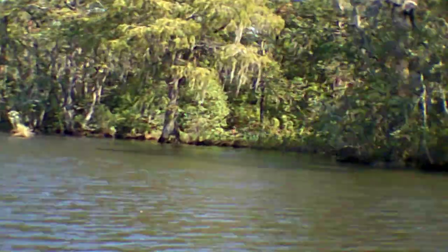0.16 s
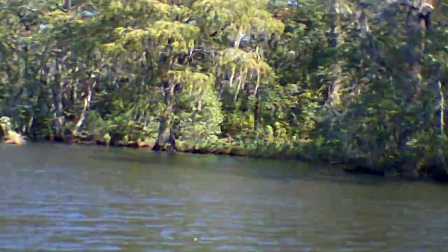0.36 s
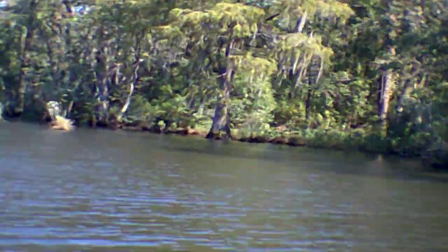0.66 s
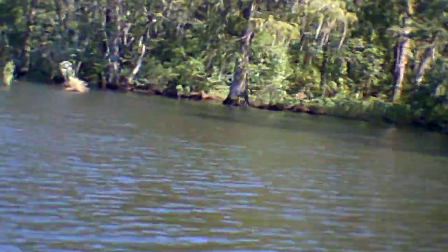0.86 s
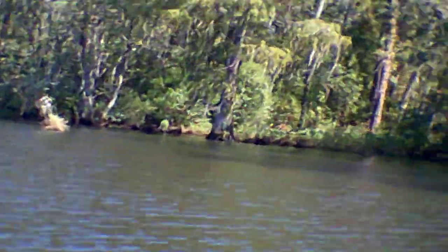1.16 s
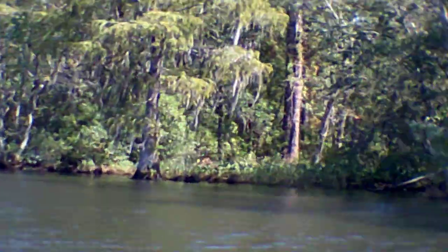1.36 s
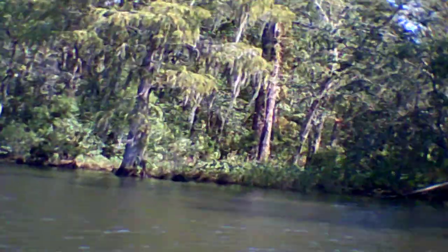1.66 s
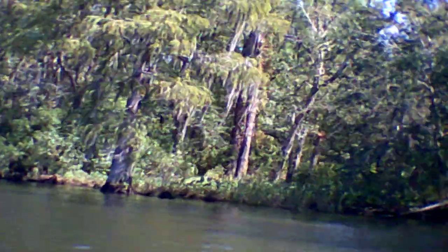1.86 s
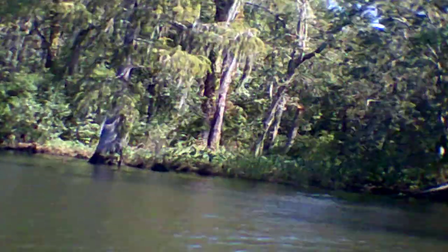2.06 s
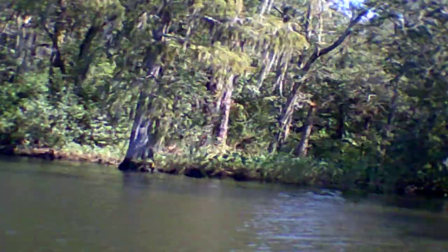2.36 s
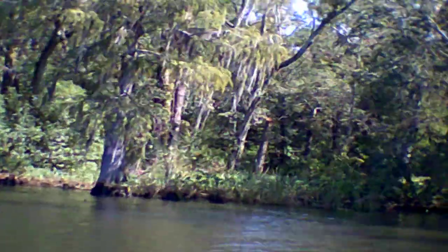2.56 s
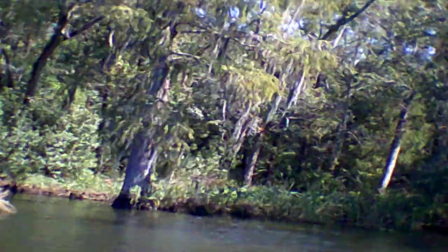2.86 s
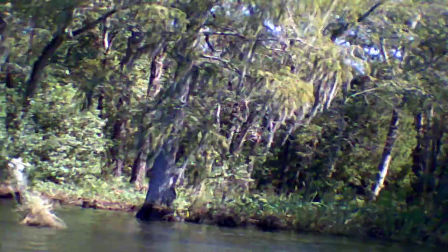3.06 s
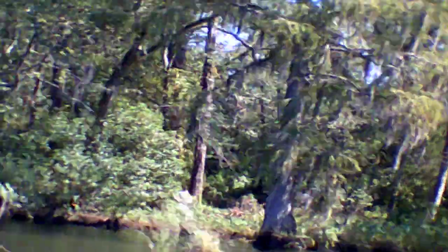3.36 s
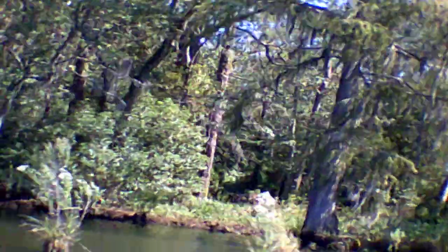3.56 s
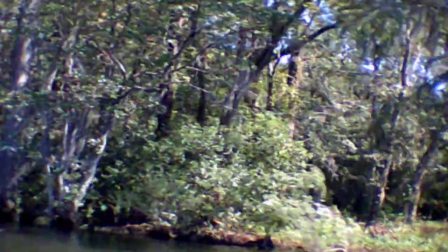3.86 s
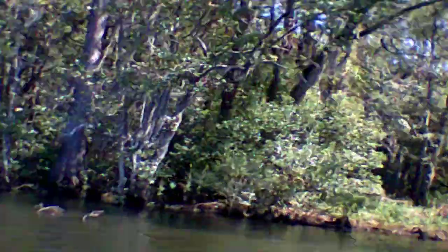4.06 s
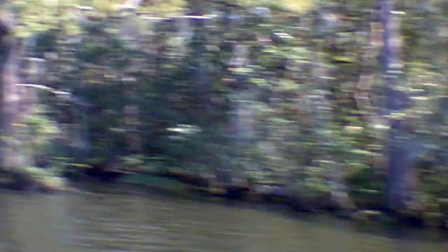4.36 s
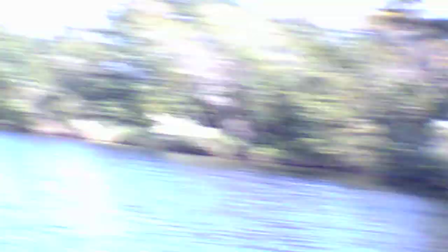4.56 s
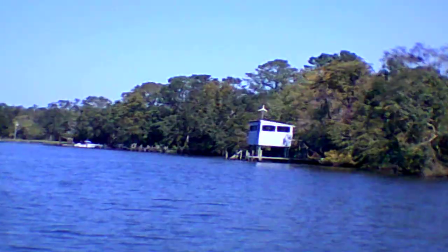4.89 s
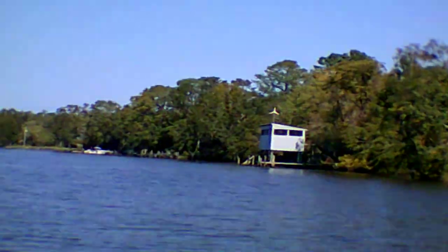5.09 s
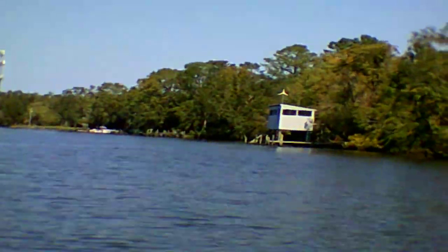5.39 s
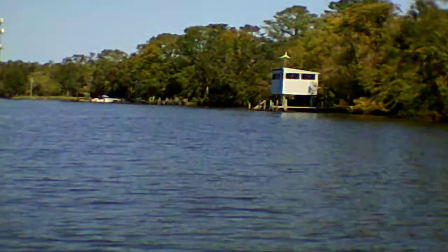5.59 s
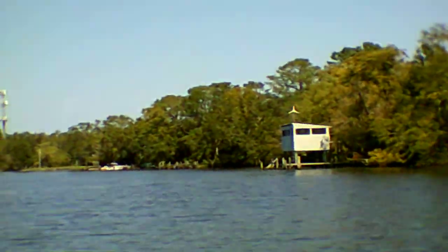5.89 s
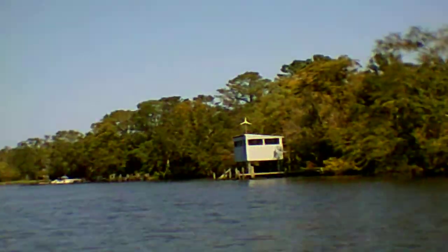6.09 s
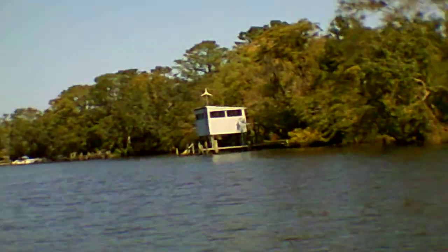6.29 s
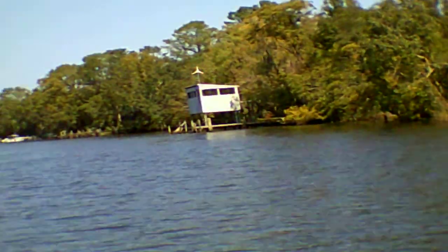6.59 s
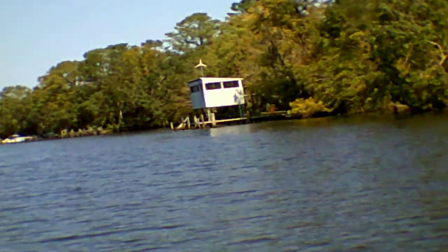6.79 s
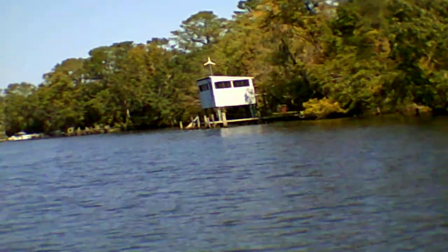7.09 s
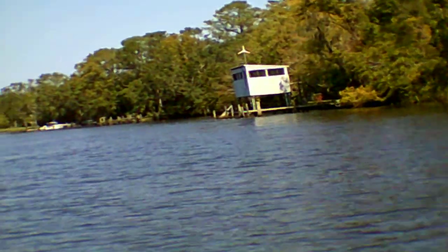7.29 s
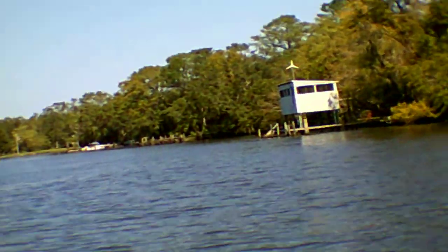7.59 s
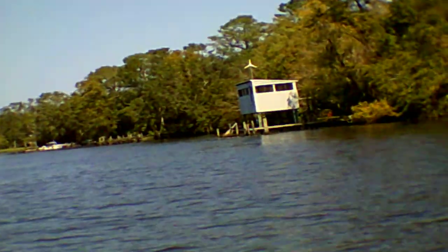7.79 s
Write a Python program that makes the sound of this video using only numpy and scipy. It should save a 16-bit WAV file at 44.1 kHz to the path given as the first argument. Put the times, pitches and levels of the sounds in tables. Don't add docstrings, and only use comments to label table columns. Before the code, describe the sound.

Close, distorted watercraft engine outdoors: a raspy, buzzing drone with gassy roar, pump whine and spray hiss. The throttle closes briefly and opens hard, twice, with choppy little dips between. Wind rumbles and thumps the bare microphone, heaviest in the middle, and water slaps the hull. Near the end the exhaust beat softens slightly as the revs waver and return to cruising speed.

```python
import sys
import numpy as np
from scipy import signal
from scipy.fft import rfft, irfft, next_fast_len
from scipy.io import wavfile
from scipy.ndimage import uniform_filter1d, map_coordinates

SR = 44100
rng = np.random.default_rng(int(sys.argv[2]) if len(sys.argv) > 2 else 0)


def bounce(signal):
    frames = np.transpose(np.atleast_2d(signal))
    limited = np.clip(frames, -1, 1)
    pcm = np.round(limited * 32767).astype(np.int16)
    wavfile.write(sys.argv[1], SR, pcm)


def makeup_ratio(level_db):
    decades = np.asarray(level_db, float) / 20
    return 10 ** decades


N = 350154
TICK = np.arange(0, N + 32, 32) / SR
CRUISE = 75


def unit(x):
    return x / np.sqrt(np.mean(x ** 2) + 1e-20)


def curves(rows):
    s, *columns = np.transpose(rows)
    return [np.interp(TICK, s, column) for column in columns]


def fine(control):
    return np.interp(np.arange(N) / SR, TICK, control)


def along(points, hz):
    f, db = np.transpose(points)
    return np.interp(np.log(hz), np.log(f), db)


def wobble(rate):
    return map_coordinates(rng.standard_normal(int(N * rate / SR) + 4), [TICK * rate])


def coloured(x, points):
    m = next_fast_len(N + 8192)
    hz, db = np.transpose(points)
    log_hz = np.log(np.fft.rfftfreq(m, 1 / SR) + 1)
    gain = makeup_ratio(np.interp(log_hz, np.log(hz + 1), db))
    return irfft(rfft(x, m) * gain, m)[..., :N]


def noise(points):
    return unit(coloured(rng.standard_normal(N), points))


# (middle of the move [s], shaft speed headed for [turns/s])
THROTTLE_MOVES = [(0, 75.2), (.501, 43.2), (.74, 108.6), (1.738, 50.7), (2.121, 76.3), (2.461, 75.7),
                  (2.805, 60.8), (2.895, 76.1), (3.435, 58.3), (3.528, 74.5), (4.031, 64.6), (4.055, 74.8),
                  (4.772, 64.5), (4.821, 75.7), (5.165, 43.6), (5.382, 108.7), (6.262, 52.7), (6.561, 76.5),
                  (7.052, 61.7), (7.312, 84.6), (7.379, 74.8)]


def revs():
    move_s, step_s = .168, .01
    gain_rate, gain_ease = 117.3, 6.6
    loss_rate, loss_ease = 224, 12.7
    t = np.arange(0, N / SR + step_s, step_s)
    s, goal = np.transpose(THROTTLE_MOVES)
    moved = np.clip((t - s[1:, None]) / move_s + .5, 0, 1)
    wanted = goal[0] + np.diff(goal) @ moved
    speed = [wanted[0]]
    for aim in wanted[1:]:
        gap = aim - speed[-1]
        rate, ease = (gain_rate, gain_ease) if gap > 0 else (loss_rate, loss_ease)
        speed.append(speed[-1] + step_s * rate * np.tanh(gap / ease))
    return np.interp(TICK, t, speed)


def shaft_angle(speed, shut):
    jog = (0.06 - 0.15 * shut) * wobble(35)
    return 2 * np.pi * np.cumsum(fine(speed)) / SR + fine(jog)


def tone(angle, order, db, lag):
    return fine(np.sqrt(2) * makeup_ratio(db + 2.27 * wobble(22))) * np.cos(order * angle - lag)


def hull_shake(angle, speed):
    return tone(angle, 0.99, -24 + 0.42 * (speed - CRUISE), 1.99)


# (frequency [Hz], level [dB])
FIRING_LEVEL = [(92, -6.5), (106, -13), (125, -16), (140, -8.5), (152, -7), (175, -6.5), (187, -10.5),
                (205, -7.5)]


def firing(angle, speed, shut, stern):
    shut_db, misfire_db = 8.5, 3
    db = along(FIRING_LEVEL, 2 * speed) + (shut_db + misfire_db * wobble(16)) * shut - 5 * stern
    return tone(angle, 2, db + 1.5, 0)


# (frequency [Hz], level [dB])
BLADE_LEVEL = [(140, -22), (170, -13), (200, -8.5), (213, -9), (224, -20.5), (270, -10), (300, -14),
               (325, -12)]


def jet_pump(angle, speed, push, shut, stern):
    shut_db, open_db, stern_db, flutter_db = 2.5, 0.5, -11, 2.5
    db = along(BLADE_LEVEL, 3 * speed) + shut_db * shut + open_db * push
    db = db + np.clip(stern, 0, 1) * (stern_db + 8 * shut - db)
    return tone(angle, 3, db + flutter_db * wobble(9) + 2.0, 0.15)


# (frequency [Hz], level [dB])
BARK_LEVEL = [(190, -18), (240, -21), (275, -18.5), (300, -14), (370, -16), (430, -14)]
# (shaft order [1], level [dB], polarity [1], change above cruise [dB per turn/s])
BARK_ORDERS = [(4, 3.5, 0.85, 0), (5, -2.5, -0.96, -0.1518)]


def exhaust_bark(angle, speed, shut, stern):
    shut_db = 2
    bark_db = along(BARK_LEVEL, 4 * speed) + shut_db * shut + 1.8 * stern + 0.81 * wobble(11)
    above = np.maximum(speed - CRUISE, -3)
    bark = 0
    for order, db, polarity, slope in BARK_ORDERS:
        bark = bark + polarity * tone(angle, order, bark_db + db + slope * above, .5)
    return bark


# (centre [Hz], width [Hz], lift [dB])
PIPE_MODES = [(502.6, 29, 14), (693, 72, 5.5), (800, 170, 3.5)]
# (shaft order [1], level [dB], polarity [1])
RASP_ORDERS = [(6, 4.5, -0.94), (7, -1, -0.83), (8, -1.5, -1.1), (9, -3, 0.46), (10, -2, -0.91),
               (11, -9.5, 0.73), (12, -9.5, 0.53), (13, -9, -0.96)]


def exhaust_rasp(angle, speed, push, settled):
    cruise_db, blat_db, waver_db = -32, 5.5, 3
    load_db = 5.8 * push
    rasp = 0
    for order, db, polarity in RASP_ORDERS:
        hz = order * speed
        lift = sum(peak / (1 + (2 * (hz - centre) / width) ** 2) for centre, width, peak in PIPE_MODES)
        blat = settled * (blat_db - 3.6 * push) / (1 + (2 * (hz - PIPE_MODES[0][0]) / 90) ** 2)
        level = cruise_db + load_db + db + lift + blat + waver_db * wobble(13)
        rasp = rasp + polarity * tone(angle, order, level, 0.35)
    return rasp


# (frequency [Hz], density [dB per Hz])
GAS_SPECTRUM = [(50, -3.5), (110, -1), (250, 1), (500, -4), (900, -10), (1500, -21), (2200, -26.5),
                (3500, -55.5), (8000, -69)]


def gas_roar(puff, speed, push, shut):
    cruise_db, db_per_turn, open_db, shut_db = -21, 0.0159, 0.5, 0.5
    db = cruise_db + db_per_turn * (speed - CRUISE) + open_db * push + shut_db * shut
    return fine(makeup_ratio(db + 7.0 + 1.1 * wobble(14))) * puff * noise(GAS_SPECTRUM)


# (frequency [Hz], density [dB per Hz])
SPRAY_SPECTRUM = [(800, -23), (1500, 3), (2200, -2.5), (3500, -16), (5500, -24.5), (8000, -24.5),
                  (12000, -43.5)]


def hull_spray(puff, speed, shut, settled):
    cruise_db, db_per_turn, shut_db, settle_db = -34.5, 0.14, 2, 1
    db = cruise_db + db_per_turn * (speed - CRUISE)
    db = db + shut_db * shut * np.clip((95 - speed) / 15, 0, 1) + settle_db * settled
    return fine(makeup_ratio(db + 3.0 + 1.3 * wobble(24))) * puff * noise(SPRAY_SPECTRUM)


# (time [s], facing the jet [1 = fully, negative = turned away])
STERN_VIEW = [(0, -0.22), (4.5, 0.023), (6.3, 0.027), (6.8, 0.58), (7.4, 0.67), (7.94, 0.51)]


def engine():
    speed = revs()
    (stern,) = curves(STERN_VIEW)
    acceleration = uniform_filter1d(np.gradient(speed, TICK), size=90)
    push = np.tanh(acceleration / 70)
    lag_s = .025
    shut = np.minimum(np.interp(TICK - lag_s, TICK, push), 0)
    planing_speed, planing_edge = 66.3, 4
    settled = 1 / (1 + np.exp((speed - planing_speed) / planing_edge))
    angle = shaft_angle(speed, shut)
    puff = 1 + 0.23 * np.cos(2 * angle - 1.1)
    mix = hull_shake(angle, speed) + firing(angle, speed, shut, stern)
    mix = mix + jet_pump(angle, speed, push, shut, stern)
    mix = mix + exhaust_bark(angle, speed, shut, stern) + exhaust_rasp(angle, speed, push, settled)
    mix = mix + gas_roar(puff, speed, push, shut) + hull_spray(puff, speed, shut, settled)
    stern_loss_db = -1
    return fine(makeup_ratio(4.0 - stern_loss_db * stern)) * mix


# (time [s], level [dB])
BREEZE = [(0, -22), (1.2, -23), (1.5, -17.5), (4.3, -17.5), (4.7, -22.5), (5.8, -31.5), (6.4, -22),
          (7.94, -24.5)]
# (time [s], level [dB], half length [s])
GUSTS = [(0.658, -23, .08), (1.4, -6, .05), (1.803, -14.5, .11), (2.089, -7.5, 0.054),
         (2.387, -11.5, 0.032), (2.549, -8.5, 0.024), (3.062, -11, 0.026), (3.457, -14, .06),
         (3.702, -11.5, 0.047), (3.906, -11, 0.048), (4.145, -12, .08), (5.193, -24.5, .1),
         (6.267, -19.5, 0.032), (6.5, -14, 0.025), (7.14, -18, 0.15)]
# (time [s], half width [s], signed pressure [full scale])
GUST_HITS = [
    (1.524, 0.0064, 1.5),
    (1.8628, 0.0027, -6.5),
    (2.046, 0.002, 4.5),
    (2.072, 0.003, 0.5),
]
# (frequency [Hz], density [dB per Hz])
WIND_SPECTRUM = [(4, -6.5), (12, 3), (40, 0.5), (80, -6), (140, -6.5), (300, -43.5), (2000, -110)]


def wind():
    hits = sum(size * np.exp(-((TICK - s) / half) ** 4) for s, half, size in GUST_HITS)
    blow = makeup_ratio(curves(BREEZE)[0])
    for s, db, half in GUSTS:
        blow = blow + makeup_ratio(db) * np.exp(-((TICK - s) / half) ** 2)
    lumps = unit(makeup_ratio(2.16 * wobble(12)))
    return fine(hits) + fine(makeup_ratio(9.0) * blow * lumps) * noise(WIND_SPECTRUM)


# (time [s], peak level [dB], 60 dB decay time [s])
SLAPS = [
    (1.51, -11, 0.018),
    (1.5125, -14, 0.012),
    (2.1054, -14, 0.016),
]
# (frequency [Hz], density [dB per Hz])
SLAP_SPECTRUM = [(300, -13.5), (1600, 3.5), (2700, -9), (6000, -20), (12000, -25)]


def splashes():
    age, burst = np.arange(SR // 10) / SR, np.zeros(N)
    for s, db, t60 in SLAPS:
        rise = 1 - np.exp(-age / 0.00065)
        burst[round(s * SR):][:len(age)] += makeup_ratio(db + 11 - 60 * age / t60) * rise
    return burst * noise(SLAP_SPECTRUM)


def scene():
    return (engine() + wind() + splashes())[None]


# (frequency [Hz], gain [dB])
CAMERA_RESPONSE = [(2000, 0), (4000, 0.5), (7800, 2), (8800, -14.5), (11000, -28.5), (16000, -18.5)]


def camera(dry):
    x, top = dry - .05, .75
    flat = x / (1 + (x / top) ** 8) ** (1 / 8)
    held = np.pad(flat, ((0, 0), (0, 1024)), "edge")
    return np.clip(coloured(held, CAMERA_RESPONSE), -.708, .708)


def roll_off(x):
    return signal.sosfilt(signal.butter(12, 15800, fs=SR, output="sos"), x)


def record(dry):
    mix = camera(dry) * np.clip((N - np.arange(N)) / 40, 0, 1)
    return roll_off(mix)


dry = scene()
out = record(dry)
bounce(out)
```